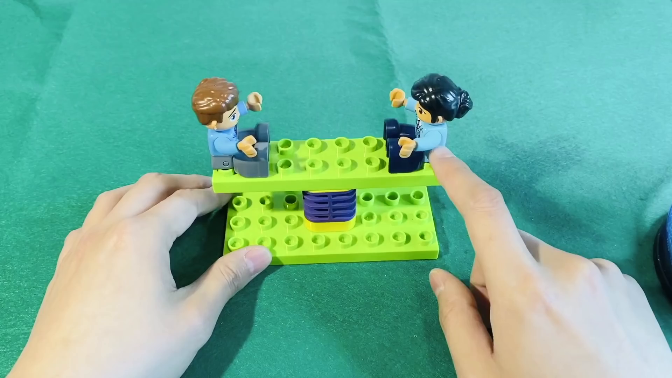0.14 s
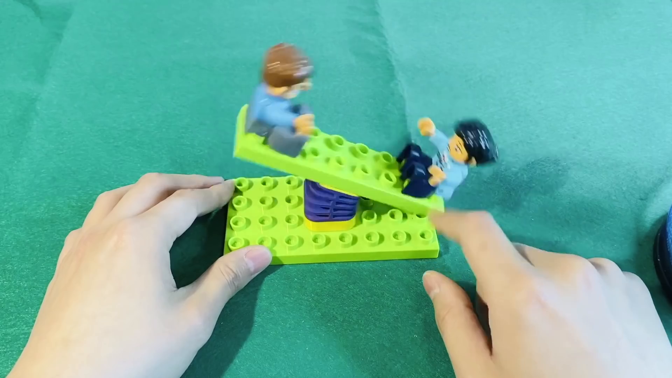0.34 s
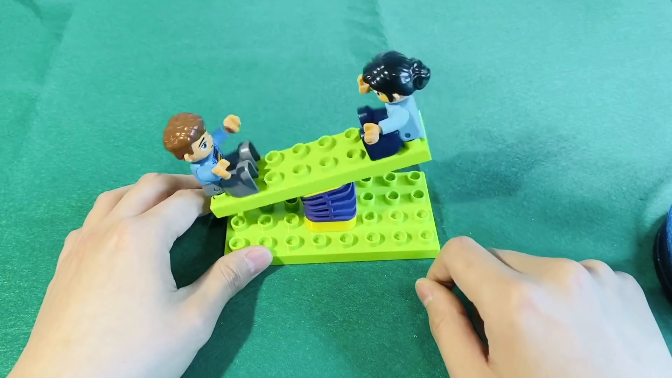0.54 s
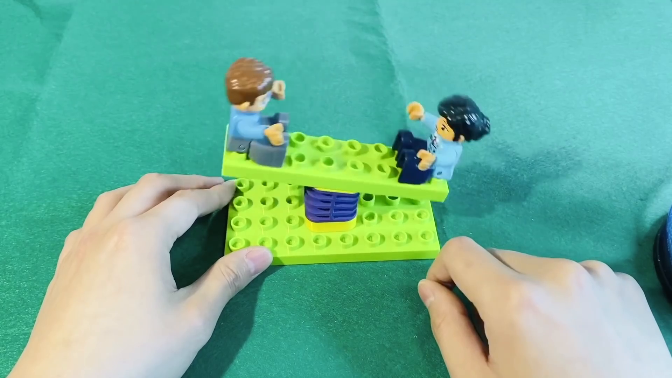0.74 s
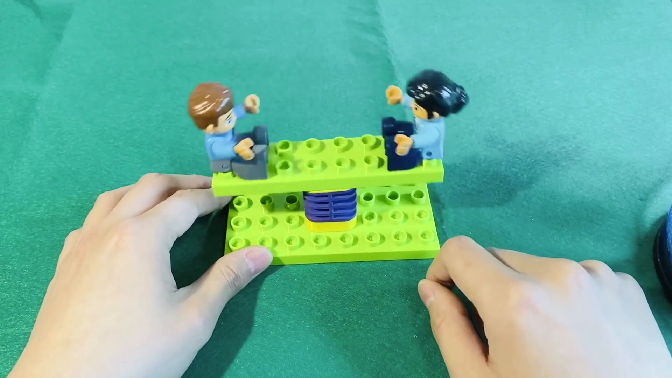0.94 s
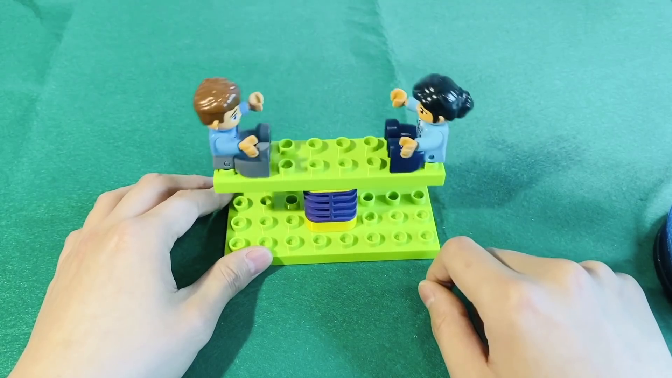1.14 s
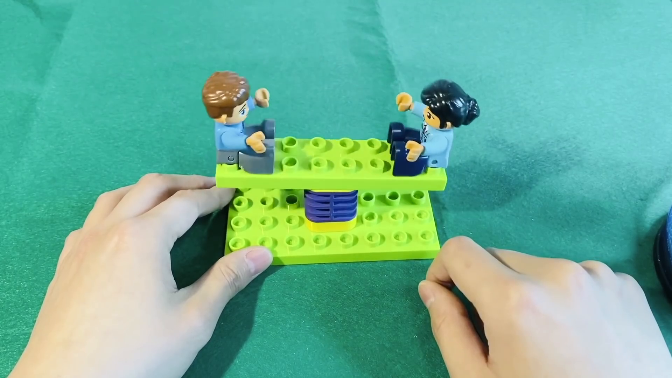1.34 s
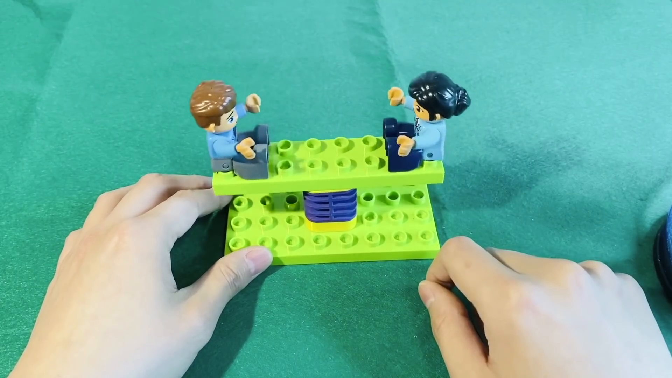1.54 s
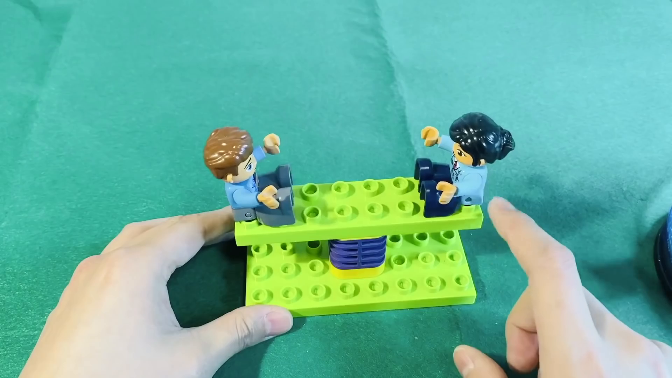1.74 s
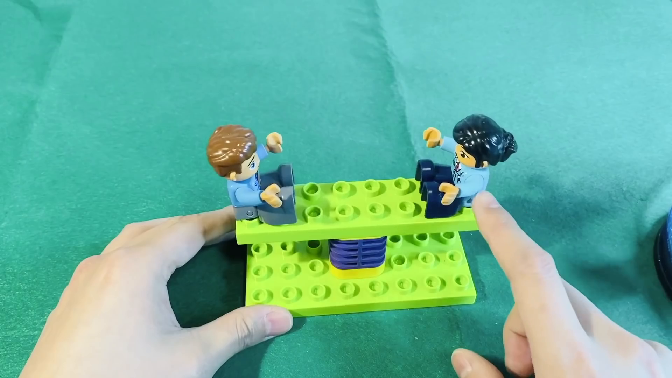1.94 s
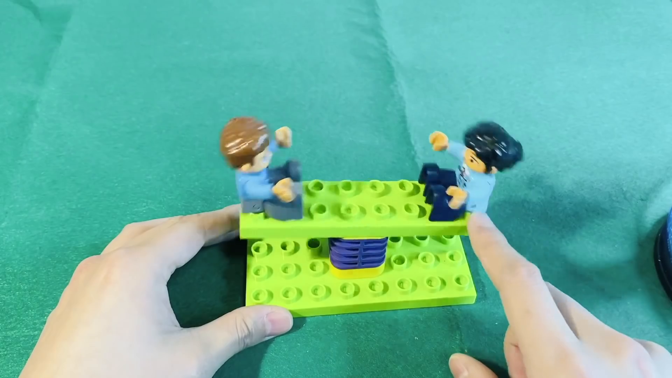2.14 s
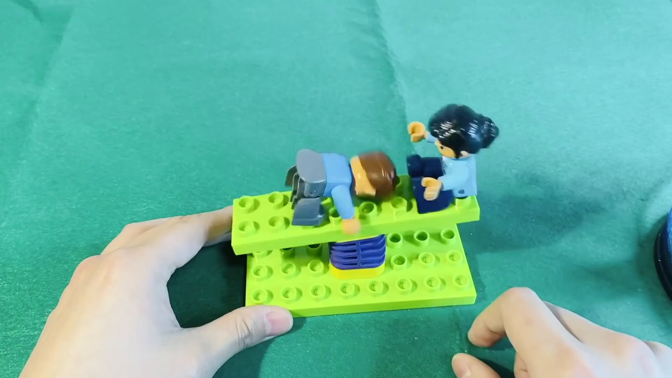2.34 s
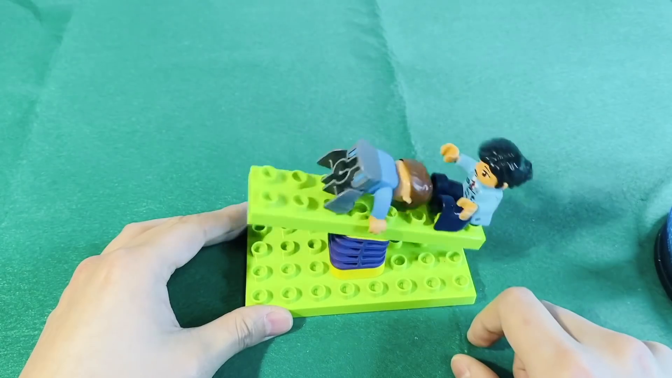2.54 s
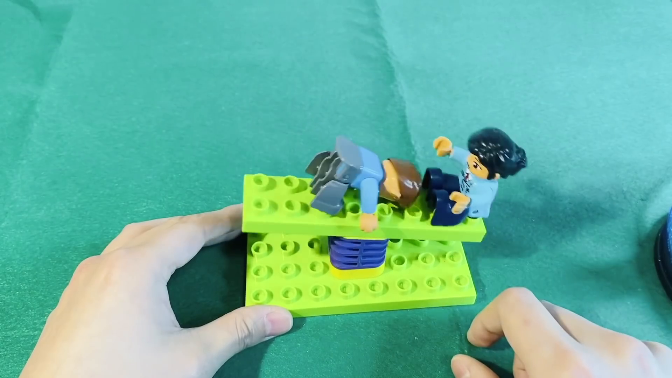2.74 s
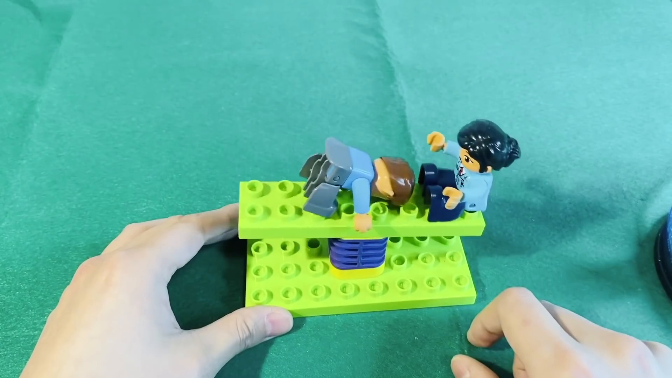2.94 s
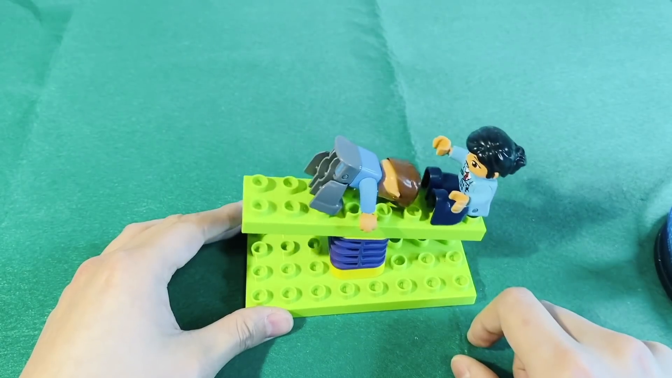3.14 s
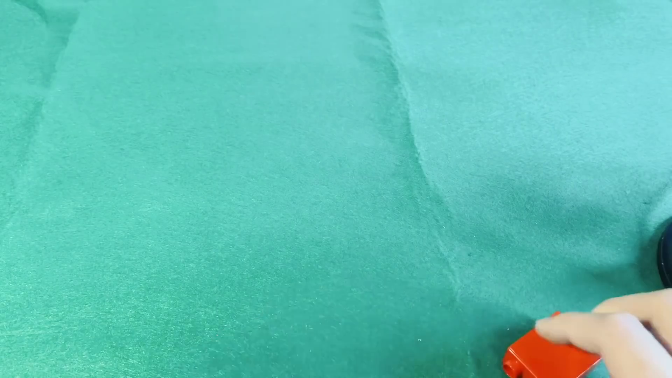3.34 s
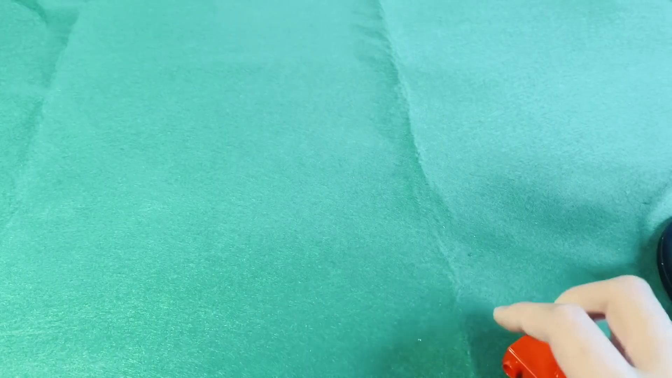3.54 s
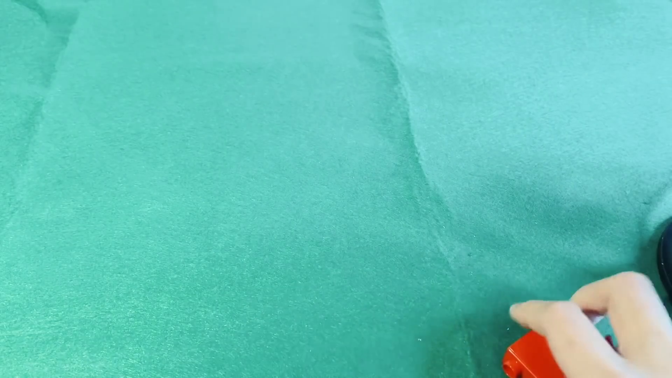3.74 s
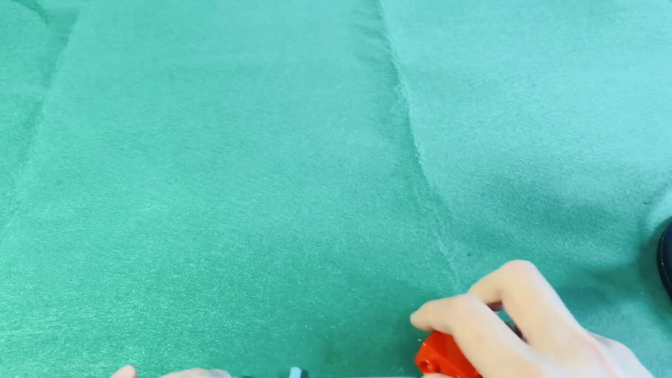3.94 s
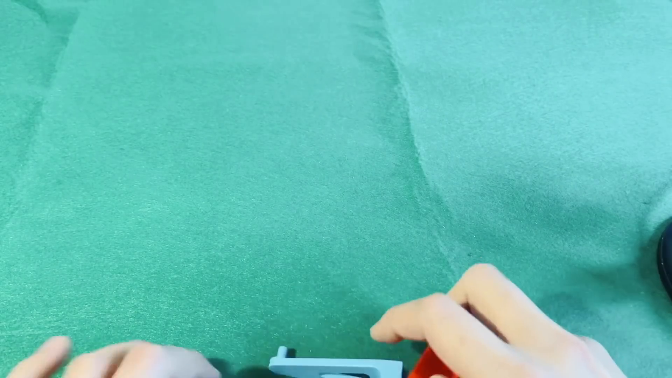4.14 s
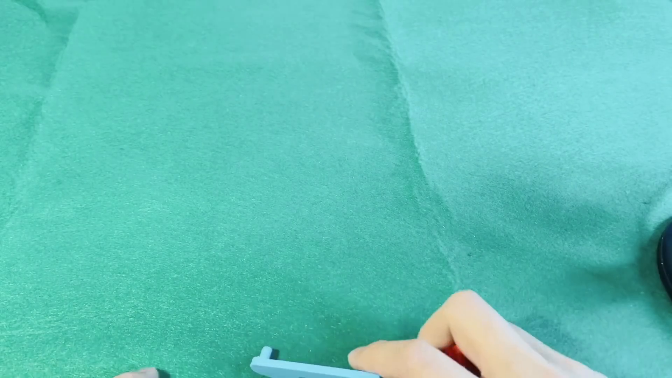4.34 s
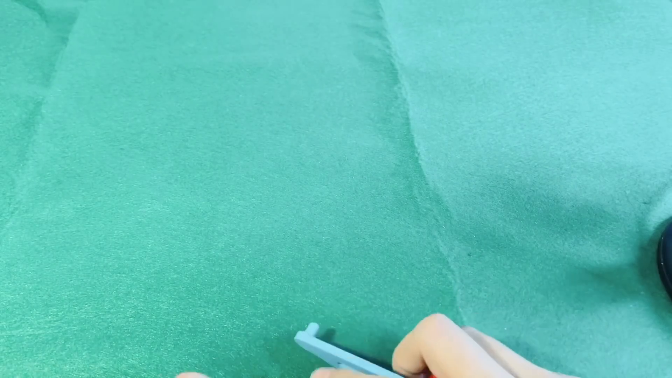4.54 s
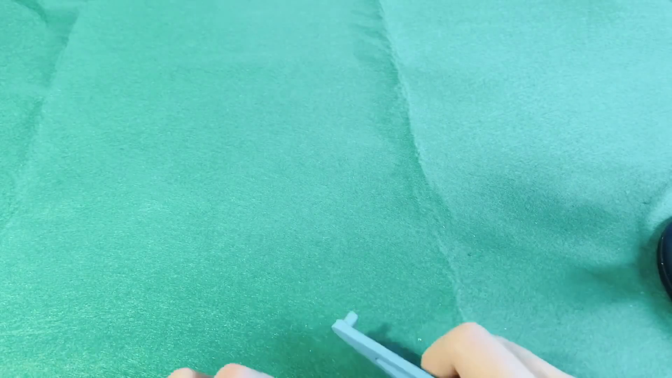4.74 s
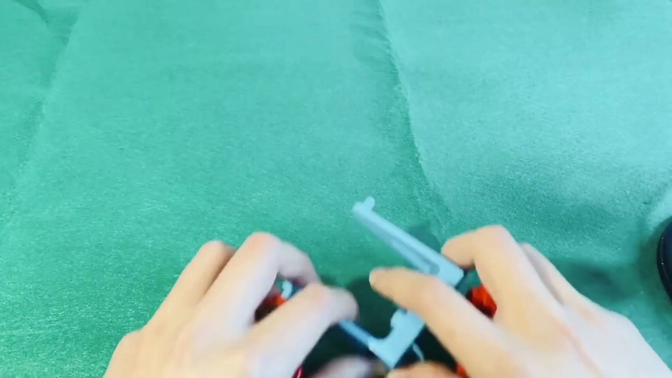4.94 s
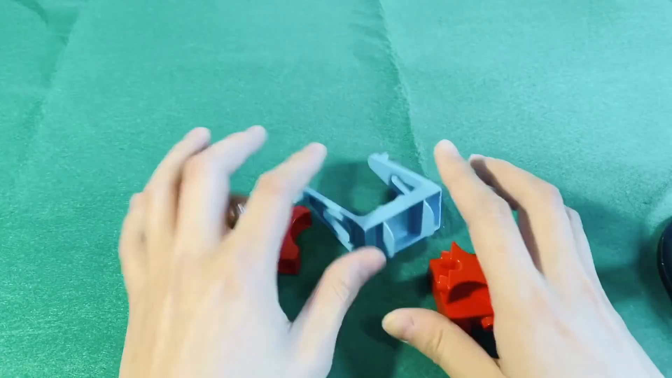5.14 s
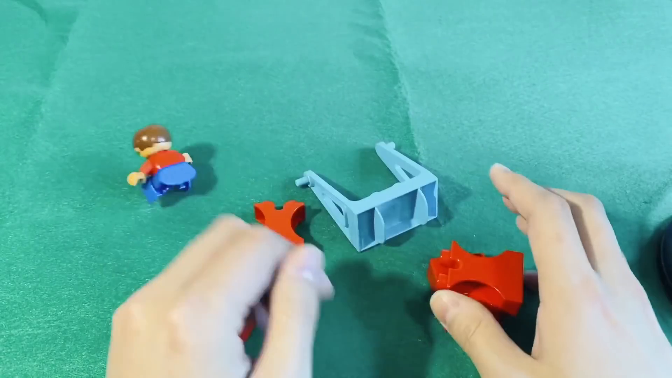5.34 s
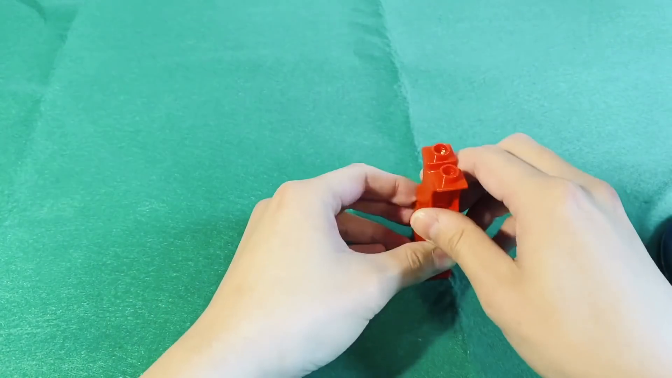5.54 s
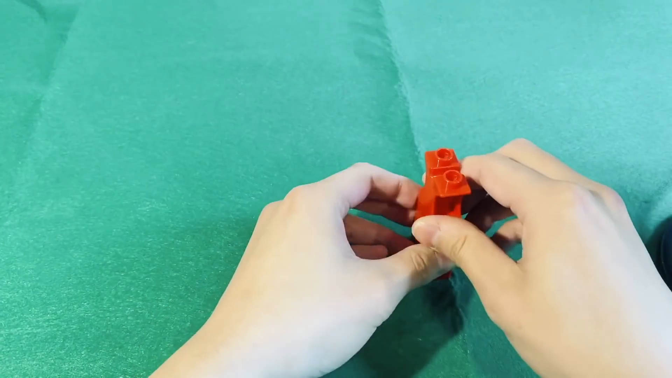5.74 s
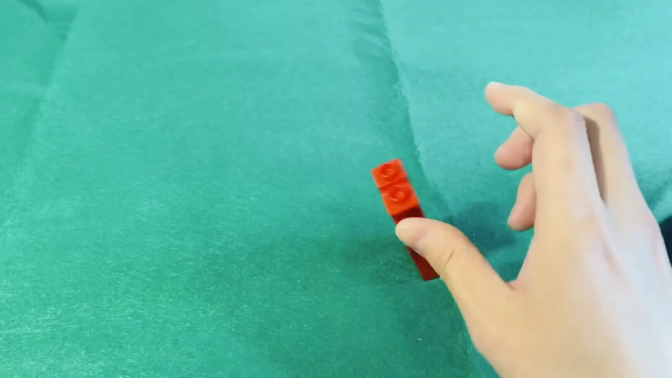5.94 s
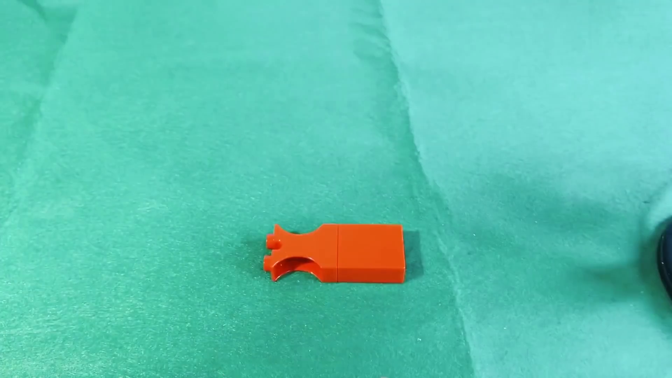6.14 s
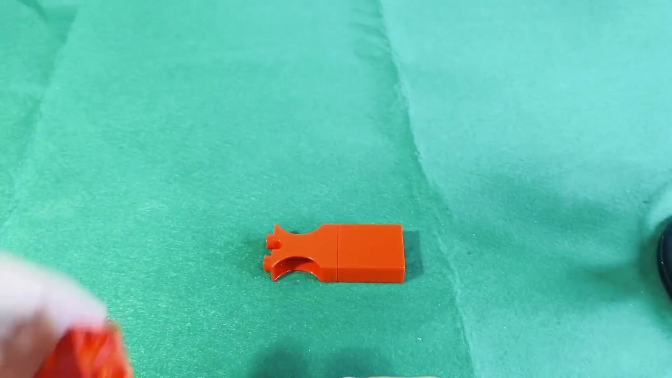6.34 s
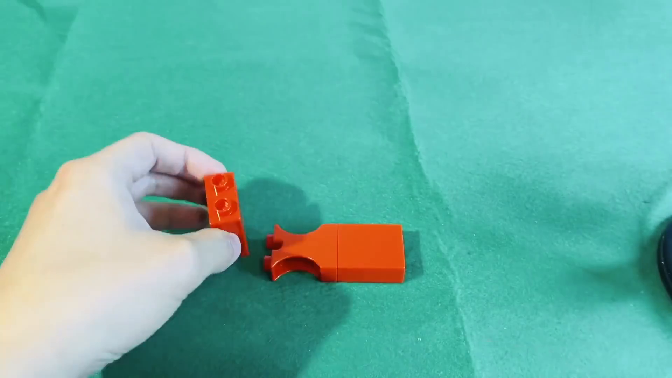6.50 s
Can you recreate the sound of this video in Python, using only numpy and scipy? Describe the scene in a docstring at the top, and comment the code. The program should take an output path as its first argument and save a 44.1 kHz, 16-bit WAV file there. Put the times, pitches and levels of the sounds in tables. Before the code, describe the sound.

Hands handle hollow plastic toy bricks on a soft mat: a knock, a tumbling clack, busy clicking, a bright rattle, dull thumps and quiet.

```python
"""A dry scrape, a tick and a plank knock open the scene: hands play with plastic toy bricks on a clothed desk, close by.
A brick seesaw is tipped, then flipped so that a figure tumbles; loose bricks are picked up, rattled and spilled.
Contacts are blows plus noise chatter ringing plastic modes; landings are dull noise puffs with decaying desk modes.
Shaped noise makes the scrapes, the drags, the hands sliding on cloth, the low rumble and the quiet background."""
import sys
import numpy as np
from scipy import signal
from scipy.fft import rfft, irfft
from scipy.io import wavfile
from scipy.ndimage import uniform_filter1d

SR = 44100
rng = np.random.default_rng(int(sys.argv[2]) if len(sys.argv) > 2 else 0)


def put_to_file(sound):
    """Save the sound as 16-bit audio at rate SR, in the file named by the first command-line argument."""
    columns = np.atleast_2d(sound).T  # one column per channel
    safe = np.clip(columns, -1, 1)
    whole_steps = np.round(safe * 32767)
    wavfile.write(sys.argv[1], SR, whole_steps.astype(np.int16))


N = 289737

# Plastic contacts: t/s, level/dB, struck spot f/Hz, hardness/(dB per octave), chatter t60/s
PLANK_HITS = [(.2646, -13.5, 736, 1.5, 0.02)]
SEESAW_HITS = [(2.0925, -35.5, 2290, -1, 0.034), (2.1498, -21.5, 3830, 3, 0.019),
               (2.1797, -19.5, 2400, 3.5, 0.022), (2.2068, -21.0, 5300, 5, 0.023),
               (2.2155, -14.5, 956, 0, 0.0025), (2.2175, -8.5, 943, 1.1, 0.0037),
               (2.233, -26, 7670, 1, 0.022), (2.243, -23.0, 900, 0.5, 0.017),
               (2.2533, -31, 7500, 3.3, 0.033), (2.2688, -37, 3330, 7, 0.028),
               (2.3005, -24.5, 860, 0.4, 0.07), (2.3436, -23.5, 994, -1.3, 0.022),
               (2.3957, -41, 2520, 1, 0.012), (2.4355, -32.0, 954, -4.5, 0.073),
               (2.4785, -32, 976, -1.5, 0.016), (2.484, -28.5, 2855, -1, 0.033),
               (2.4959, -27.0, 876, 0.5, 0.1), (2.5162, -27, 1063, -7, 0.051),
               (2.5279, -31.5, 940, 1.5, 0.12), (2.5494, -30.0, 987, -5.0, 0.026),
               (2.5646, -36.0, 990, -6, 0.06)]
BRICK_HITS = [(3.5321, -23, 4210, 1.5, 0.025), (3.7534, -37.5, 1770, -4, 0.0065),
              (3.7842, -35, 5300, 1, 0.032), (3.8137, -28, 4650, 0.5, 0.01), (3.8376, -30, 2074, 6.5, .061),
              (3.8508, -20, 1764, -4, 0.022), (3.8743, -24, 1323, -5, 0.0077),
              (3.8871, -19, 1250, -2.5, 0.048), (3.9212, -23.5, 2133, 4, 0.018),
              (3.9448, -17, 2944, -3.5, 0.0037), (3.9597, -26.5, 1602, -1.5, 0.039),
              (3.9823, -30.5, 6360, 9.5, 0.019), (4.0415, -14, 1780, -1.5, 0.066),
              (4.0495, -25.5, 4080, 9.5, 0.018), (4.0568, -20, 1980, -4, 0.029),
              (4.0689, -23, 1993, -1, 0.028), (4.1183, -29, 7900, 7, 0.036),
              (4.1515, -36.5, 1850, 0.5, 0.086), (4.5132, -39, 1265, 1.5, 0.013),
              (4.5756, -34, 1370, -1, 0.028), (4.5832, -19, 2193, -2, 0.005),
              (4.5868, -10.5, 2580, 0, 0.0057), (4.6203, -23, 2560, -0.5, 0.0068),
              (4.7098, -43, 4270, 2, 0.016), (5.269, -41.5, 800, 0, 0.027), (5.6102, -39, 870, -1.5, .008)]
CLINK_HITS = [(4.1978, -33.0, 3000, -7, 0.012), (4.2144, -16.5, 4270, 6, 0.045),
              (4.236, -5.5, 4300, 6.63, 0.015), (4.2524, -12, 4300, 6.5, 0.016),
              (4.2625, -27.5, 4290, -8, 0.01), (4.2712, -21.5, 4230, -9.8, 0.007),
              (4.2748, -13.0, 4340, 8.3, 0.018)]
RATTLE_HITS = [(4.3052, -15.5, 1960, -0.5, 0.024), (4.3086, -17, 2070, 2.5, 0.011),
               (4.3135, -17.5, 3270, 0, 0.027), (4.3272, -15, 5250, -3, 0.012),
               (4.3312, -14, 2060, 1.5, 0.019), (4.3375, -18, 1970, -8.7, 0.011),
               (4.3455, -22.0, 1800, 1.0, 0.018), (4.352, -35, 2050, 5, 0.053),
               (4.3673, -15, 1760, -6.5, 0.011), (4.381, -16.5, 2580, -1, 0.02),
               (4.385, -26, 5500, 2.8, 0.014), (4.4177, -28.5, 2050, -4.3, 0.015)]
SPILL_HITS = [(4.8788, -34, 2890, -2.5, 0.052), (4.8907, -14.5, 6030, 1, 0.016),
              (4.899, -13.5, 5540, 2.0, 0.021), (4.9082, -23.5, 8230, -1.2, 0.066),
              (4.9272, -15, 4970, 6.5, 0.051), (4.9377, -9, 5490, 2, 0.005), (4.947, -20, 6100, 2.6, 0.059),
              (4.9548, -12.0, 2100, 0, 0.13), (4.9678, -19.5, 2080, 5.5, 0.0055),
              (4.9742, -19, 6850, 2, 0.058), (4.986, -31.5, 4100, 4.5, 0.058),
              (5.0005, -25.5, 840, 0.8, 0.049)]
SET_DOWN_HITS = [(6.059, -44, 2030, -16.5, 0.093), (6.1244, -42, 2770, 0, 0.049),
                 (6.153, -36.5, 2030, -1, 0.034), (6.2251, -37, 580, -6.5, 0.048),
                 (6.284, -32, 4950, -1.5, 0.017)]
# Modes of each plastic thing: f/Hz, width/Hz, relative gain/dB
PLANK_MODES = [(486, 94, -12), (704.5, 270, 9), (1250, 130, -12.5), (2470, 300, -2.5), (3334, 16, -1),
               (4120, 490, 2), (5900, 260, -13), (7400, 500, -22)]
SEESAW_MODES = [(532.4, 70, 3), (910, 90, 5.5), (2200, 160, -20.5), (3360, 61, -16.5), (3970, 140, -10.5),
                (5570, 110, -7), (6980, 170, -6.5), (7450, 180, -18.5), (8140, 100, -10.5),
                (13000, 510, -15.5)]
BRICK_MODES = [(1315, 140, 1.5), (1740, 79, 5), (2104, 73, -1), (2930, 180, -9), (4080, 64, -4),
               (3930, 66.8, -6), (5270, 140, -9.5), (5740, 80, -23), (7760, 420, -1.5), (13400, 460, -17)]
SMALL_PART_MODES = [(2191, 27, -10.5), (3660, 200, -11.5), (4281, 56, 2.5), (6160, 98, -17),
                    (8360, 100, -3), (11330, 380, -17), (11800, 870, -12.5)]
FRAME_MODES = [(1320, 81, -0.5), (2110, 150, -8), (3140, 75, -6.5), (3830, 207, -11.5), (4880, 160, -19.5),
               (5440, 50, 7), (7800, 52, 1), (8740, 140, -11.5), (10200, 89, -17), (13500, 51, -22)]
HEAP_MODES = [(1550, 83, -9), (1961, 6.2, -6.5), (2690, 310, -19), (4360, 23.4, 4), (5440, 120, -30),
              (6170, 55, 1), (7600, 21, -10.5), (8180, 130, 2), (8830, 85, -9), (10100, 140, -23.5),
              (11700, 230, -14), (14300, 240, -13)]
HOLLOW_BRICK_MODES = [(575, 64, 11), (810, 510, -3), (1340, 44, -9), (1577, 78, -3), (2094, 69, -4),
                      (3020, 66, -13), (5130, 160, -11.5), (7060, 820, -33)]
# Edges of the four voice bands: f/Hz
BAND_EDGES_HZ = [350, 1500, 3300, 7000, 16000]
# Voice of each thing, relative: hollow knock/dB, clack/dB, click/dB, fine edge/dB
PLANK_VOICE_DB = [-2.5, -3, 0, -13.5]
SEESAW_VOICE_DB = [-1, 1, 1, -6.5]
BRICK_VOICE_DB = [-7.5, -2.5, -1.5, -8]
SMALL_PART_VOICE_DB = [-25, -1, 1.5, -11.5]
FRAME_VOICE_DB = [-12, -3, -2.5, -6]
HEAP_VOICE_DB = [-21, -11, -4, -7]
SET_DOWN_VOICE_DB = [-11, 2.5, 2, -1]
# Plastic scraping on plastic: start/s, end/s, level/dB, centre f/Hz
SCRAPES = [(0.158, 0.204, -54.5, 4370), (0.181, 0.272, -60.5, 2256), (2.046, 2.146, -62.5, 2330),
           (3.604, 3.787, -54, 6800), (3.785, 3.993, -52.5, 2500), (4.239, 4.298, -32.5, 4480),
           (4.377, 4.437, -39.5, 2487)]
# Hollow brick dragged over the mat: start/s, end/s, level/dB
DRAGS = [(6.152, 6.259, -52), (6.275, 6.437, -56.5)]
# Light ticks: t/s, level/dB, reference f/Hz (the passband lies just below)
TICKS = [(.181, -43.5, 3350), (1.973, -59, 1625), (3.081, -58, 1100), (4.487, -44.5, 1955),
         (4.661, -50, 2520), (4.818, -52, 2030), (4.8677, -40.5, 2810), (5.2133, -49, 7170),
         (5.278, -52, 5940), (5.4182, -56, 8570), (5.782, -63.5, 8620)]
# Jostling loose bricks: start/s, end/s, mean level/dB, reference f/Hz as in TICKS
JOSTLES = [(3.659, 3.741, -50.5, 9050), (4.079, 4.14, -59.5, 2375)]
# Soft landings on cloth: t/s, puff level/dB, puff upper f/Hz, desk boom/dB before TOP_LIFT_DB
LANDINGS = [(.266, -31.5, 600, -14.5), (2.168, -47, 500, -25), (2.22, -46, 700, -22.5),
            (2.481, -36.5, 600, -32.5), (3.153, -41.5, 345, -38), (3.244, -45.5, 367, -46.5),
            (4.05, -46, 401, -32.5), (4.184, -28.5, 410, -26.5), (4.389, -28.5, 540, -52),
            (4.586, -31, 400, -34), (4.88, -34, 450, -34.5), (4.966, -24, 1070, -43),
            (4.977, -17.5, 865, -41), (5.007, -16.5, 1120, -20), (5.021, -23, 444, -20),
            (5.089, -30.5, 650, -13.5), (5.27, -22.5, 810, -14.5), (5.283, -21.5, 382, -46),
            (5.611, -41, 1320, -52), (5.704, -49.5, 1079, -46), (5.944, -40, 1430, -28.5),
            (5.951, -23, 1020, -27), (5.971, -32.5, 980, -38), (5.987, -29, 760, -40)]
# Hand moves: start/s, end/s, press/dB before SWAY_LIFT_DB, rumble level/dB, slide/dB before SLIDE_LIFT_DB
HAND_MOVES = [(0.173, 0.357, -43.5, -34, -64.5), (1.95, 2.082, -52.5, -46, -62.5),
              (2.078, 2.504, -33, -32.5, -64.5), (3.147, 3.441, -31, -42, -62),
              (3.547, 3.674, -29, -33, -54), (3.659, 4.165, -38.5, -35, -51),
              (4.17, 4.407, -24, -32.5, -42), (4.426, 4.594, -38.5, -35, -52),
              (4.593, 4.875, -22.5, -37, -55.5), (4.869, 5.268, -30, -30, -56),
              (5.262, 5.402, -19, -37, -55.5), (5.411, 5.929, -46, -45, -74), (5.952, 6.2, -21.5, -42, -74),
              (6.202, 6.421, -59, -47.5, -61)]
# Desk sway modes, nominal: f/Hz, gain/dB, t60/s
SWAY_MODES = [(68.93, -2, 1), (57, -2.5, 0.19), (92.47, -8.5, 0.76)]
# Desk top modes, nominal: f/Hz, gain/dB, t60/s
TOP_MODES = [(126.8, 4, 0.3), (129.6, -4.5, 0.27), (191.4, -20.5, 0.029), (249, -25.5, 0.12),
             (312, -29.5, 0.43)]
# Dry clicks where the boom cuts in and breaks off: t/s, level/dB
SNAPS = [(3.1514, -32), (5.392, -23)]
# Noise spectra, relative: f/Hz, density/(dB per Hz)
CLOTH_SPECTRUM = [(120, -30), (200, 6), (448, -6.5), (569, -8.5), (763, -11.5), (1270, -6), (3020, -8),
                  (7830, -11), (16000, -27)]
RUMBLE_SPECTRUM = [(15, -6.5), (30, -5), (48, 7), (70, 1), (120, -11), (180, -22), (400, -40), (1000, -72)]
QUIET_SPECTRUM = [(59, -48), (100, -18), (143, 6.5), (166, -12), (308, -13.5), (768, -22.5), (1550, -25.5),
                  (4110, -27), (4670, -28), (13500, -30), (16000, -34)]
# Room decay: f/Hz, t60/s
ROOM_T60 = [(150, 0.26), (600, 0.23), (3500, 0.3), (8000, 0.15), (15000, 0.07)]

FOCUS_DB, FOCUS_OCTAVES = 8, 0.7  # voice lift around the struck spot's pitch
MODE_SPREAD_DB = 2.5  # each blow favours different modes
JOSTLE_GAP_S, JOSTLE_SPREAD_DB = 0.017, 6.5
PUFF_T60_CYCLES, PUFF_LOW_HZ = 70, 136  # cycles of the upper frequency: duller is longer
MOVE_RISE_S, SLIDE_FALL_S, SHAKE_T60_S = 0.025, 0.1, 0.99
TOP_LIFT_DB, SWAY_LIFT_DB, SLIDE_LIFT_DB = 5, 2, -2
RESTING_DB, QUIET_DB, ROOM_DB = -56, -62.5, -16.5
BREAK_S, EDGE_HZ = 5.392, 16100


def amp(db):
    """Decibels to gain."""
    return 10 ** (np.asarray(db) / 20)


def evened(x):
    """Scales to rms 1."""
    return x / np.sqrt(np.mean(x ** 2) + 1e-20)


def read(points, hz):
    """Interpolates a table on a log-frequency axis."""
    f, value = np.transpose(points)
    return np.interp(np.log(hz + 1), np.log(f + 1), value)


def add(mix, s, sound):
    """Mixes a sound in at time s."""
    part = mix[max(round(s * SR), 0):][:len(sound)]
    part += sound[:len(part)]


def dying(t, t60):
    """Exponential decay, 60 dB down after t60."""
    return np.exp(-np.log(1000) * t / max(t60, 1e-3))


def burst_power(x):
    """Energy of a short sound as its power over 5 ms."""
    return np.sum(x ** 2) / (0.005 * SR) + 1e-20


def noise(spectrum):
    """Gaussian noise of rms 1 with the given spectrum."""
    gain = amp(read(spectrum, np.fft.rfftfreq(N, 1 / SR)))
    return evened(irfft(rfft(rng.standard_normal(N)) * gain, N))


def causal(gain, size):
    """Minimum-phase response of this magnitude: no ringing before its cause."""
    log_gain = np.log(np.r_[gain, gain[-2:0:-1]] + 1e-5)
    return np.exp(np.conj(signal.hilbert(log_gain)))[:size // 2 + 1]


def resonances(modes, hz):
    """Frequency response of a set of damped modes."""
    return sum(amp(db) / (1 + 2j * (hz - f) / width) for f, width, db in modes)


def unbroken(start, now):
    """False from BREAK_S on for a sound begun by then."""
    return (now < BREAK_S) | (start > BREAK_S)


def hands(grain=0.14):
    """Each move rises, holds and fades; it shakes the desk and brushes the weave of the cloth."""
    t = np.arange(N) / SR
    shake, rub = np.full(N, amp(RESTING_DB)), np.zeros(N)
    for start, end, _, rumble_db, slide_db in HAND_MOVES:
        attack = np.clip((t - start) / MOVE_RISE_S, 0, 1) * unbroken(start, t)
        after = np.maximum(t - end, 0)
        shake = np.maximum(shake, amp(rumble_db) * attack * dying(after, SHAKE_T60_S))
        rub = np.maximum(rub, amp(slide_db) * attack * (1 - after / SLIDE_FALL_S))
    weave = evened(np.exp(grain * evened(uniform_filter1d(rng.standard_normal(N), 60))))
    rumble = shake * noise(RUMBLE_SPECTRUM)
    return rumble + amp(SLIDE_LIFT_DB) * rub * weave * noise(CLOTH_SPECTRUM)


def friction(seconds, grain):
    """A stroke of tiny uneven slips that swells and fades."""
    count = max(round(seconds * SR), 64)
    unevenness = evened(uniform_filter1d(rng.standard_normal(N), size=40))[:count]
    slips = rng.standard_normal(count) * np.exp(grain * unevenness)
    return slips * np.sin(np.pi * np.arange(count) / count)


def scrapes():
    """Dry plastic-on-plastic friction, band-passed about its centre frequency."""
    out = np.zeros(N)
    for start, end, db, hz in SCRAPES:
        edge = signal.butter(2, [hz / 2, min(hz * 2, 16000)], "band", fs=SR, output="sos")
        add(out, start, amp(db) * evened(signal.sosfilt(edge, friction(end - start, grain=0.53))))
    return out


def drags():
    """Friction on the mat rings the modes of a hollow brick."""
    out = np.zeros(N)
    for start, end, db in DRAGS:
        stroke = np.pad(friction(end - start, grain=0.9), (0, 2048))
        response = resonances(HOLLOW_BRICK_MODES, np.fft.rfftfreq(len(stroke), 1 / SR))
        hollow = irfft(rfft(stroke) * response)
        add(out, start, amp(db) * evened(hollow))
    return out


def desk(rise_s=0.037):
    """Landings drum the top, pressing hands sway it; modes swell and die, and at BREAK_S the boom stops dead."""
    t, out = np.arange(SR) / SR, np.zeros(N)
    pushes = [(s, db + TOP_LIFT_DB, TOP_MODES) for s, _, _, db in LANDINGS]
    pushes += [(s, db + SWAY_LIFT_DB, SWAY_MODES) for s, _, db, _, _ in HAND_MOVES]
    for s, push_db, modes in pushes:
        boom = np.zeros(SR)
        for hz, db, t60 in modes:
            detuned_hz = hz * rng.uniform(0.94, 1.02)
            boom += amp(push_db + db) * dying(t, t60) * np.sin(2 * np.pi * detuned_hz * t)
        add(out, s, boom * (1 - np.exp(-t / rise_s)) * unbroken(s, s + t))
    return out


def jostles():
    """Rows for runs of ticks, uneven in spacing and strength."""
    rows = []
    for start, end, db, hz in JOSTLES:
        for s in np.arange(start, end, JOSTLE_GAP_S):
            jitter_s = JOSTLE_GAP_S * (rng.random() - 0.5)
            rows.append((s + jitter_s, db + JOSTLE_SPREAD_DB * rng.standard_normal(), hz))
    return rows


def ticks(t60_s=0.016):
    """Light ticks: decaying noise in a narrow band, with little ring."""
    t, out = np.arange(SR // 20) / SR, np.zeros(N)
    for s, db, hz in TICKS + jostles():
        piece = signal.butter(1, [hz / 1.3, min(hz * 0.88, 16000)], "band", fs=SR, output="sos")
        tick = signal.sosfilt(piece, rng.standard_normal(len(t)) * dying(t, t60_s))
        add(out, s, amp(db) * tick / np.sqrt(burst_power(tick)))
    return out


def contacts(hits, modes, voice_db, crack_db, chatter, bounce, spot_db, spot_width_hz, damped_t60_s,
             bass_hz, soft_hz, size=8192):
    """Blow, rebounds and dying chatter ring the plastic; the spot sets pitch, hardness tilts the voice to treble."""
    t, hz, out = np.arange(size) / SR, np.fft.rfftfreq(size, 1 / SR), np.zeros(N)
    edges = np.array(BAND_EDGES_HZ)
    centres = np.sqrt(edges[:-1] * edges[1:])
    bands = [(hz >= lo) & (hz < hi) for lo, hi in zip(edges, edges[1:])]
    # small parts radiate little bass; finite contact time rounds off the top
    bass_loss, contact_loss = 1 + (bass_hz / (hz + 1)) ** 6, 1 + (hz / soft_hz) ** 6
    radiation = causal(1 / np.sqrt(bass_loss * contact_loss), size)
    gaps_s = np.diff([row[0] for row in hits], append=N / SR)
    for (s, level_db, spot_hz, hardness_db, t60), gap_s in zip(hits, gaps_s):
        focus_db = FOCUS_DB * np.exp(-(np.log2(centres / spot_hz) / FOCUS_OCTAVES) ** 2)
        colour_db = np.array(voice_db) + hardness_db * np.log2(centres) + focus_db
        band_db = level_db + colour_db - 20 * np.log10(np.linalg.norm(amp(colour_db)))
        varied = [(f, width, db + MODE_SPREAD_DB * rng.standard_normal()) for f, width, db in modes]
        body = amp(crack_db) + resonances(varied, hz)
        spot = resonances([(spot_hz, spot_width_hz, spot_db)], hz)
        grains = rng.standard_normal(size) * np.sqrt(rng.exponential(1, size)) * dying(t, t60)
        drive = chatter * grains / np.linalg.norm(grains)
        drive[0] += 1  # the blow
        # random rebounds comb each click differently
        delays_s = np.cumsum(rng.uniform(0.0003, 0.0012, size=3))
        echoes = sum(rng.choice([-1, 1]) * np.exp(-2j * np.pi * hz * d) for d in delays_s)
        ring = rfft(drive) * (1 + bounce * echoes) * radiation * (body + spot)
        for _ in range(3):  # repeated to approach the band levels
            weight_db = [db - 10 * np.log10(burst_power(irfft(ring * band)))
                         for db, band in zip(band_db, bands)]
            ring = ring * causal(amp(read(list(zip(centres, weight_db)), hz)), size)
        held = dying(np.maximum(t - gap_s, 0), damped_t60_s)  # next contact deadens this ring
        fade = np.cos(np.pi / 2 * t / t[-1]) ** 2
        add(out, s, irfft(ring) * held * fade)
    return out


def plank():
    """The plank hits its base: broad low modes with little rebound."""
    return contacts(PLANK_HITS, PLANK_MODES, PLANK_VOICE_DB, crack_db=-16, chatter=1.0, bounce=0.063,
                    spot_db=-4, spot_width_hz=120, damped_t60_s=0.1, bass_hz=152, soft_hz=11500)


def thuds():
    """Cloth cushions a landing into a dull puff of decaying noise."""
    t, out = np.arange(SR // 4) / SR, np.zeros(N)
    for s, db, dull_hz, _ in LANDINGS:
        cushion = signal.butter(3, [PUFF_LOW_HZ, dull_hz], "band", fs=SR, output="sos")
        burst = rng.standard_normal(len(t)) * dying(t, PUFF_T60_CYCLES / dull_hz)
        puff = signal.sosfilt(cushion, burst)
        add(out, s, amp(db) * puff / np.sqrt(burst_power(puff)))
    return out


def seesaw():
    """The tumbling seesaw: hollow low modes under a clattering top."""
    return contacts(SEESAW_HITS, SEESAW_MODES, SEESAW_VOICE_DB, crack_db=-16, chatter=0.56, bounce=0.33,
                    spot_db=5, spot_width_hz=85, damped_t60_s=0.12, bass_hz=218.5, soft_hz=10100)


def snaps(t60_s=0.012):
    """Decaying steps: the dry clicks with which the boom cuts in and breaks off."""
    out = np.zeros(N)
    for s, db in SNAPS:
        add(out, s, amp(db) * dying(np.arange(2048) / SR, t60_s))
    return out


def bricks():
    """Single bricks: strong chatter and rebounds, little bass radiation."""
    return contacts(BRICK_HITS, BRICK_MODES, BRICK_VOICE_DB, crack_db=-4, chatter=1.8, bounce=0.47,
                    spot_db=6, spot_width_hz=280, damped_t60_s=0.097, bass_hz=920, soft_hz=12300)


def clinks():
    """A small ringing part, quickly deadened by the next contact."""
    return contacts(CLINK_HITS, SMALL_PART_MODES, SMALL_PART_VOICE_DB, crack_db=-33.5, chatter=0.35, bounce=0.14,
                    spot_db=-26.5, spot_width_hz=85, damped_t60_s=0.02, bass_hz=397, soft_hz=13000)


def rattle():
    """A thin frame rattles, its chatter stronger than the blow."""
    return contacts(RATTLE_HITS, FRAME_MODES, FRAME_VOICE_DB, crack_db=-15, chatter=3.7, bounce=0.4,
                    spot_db=-0.5, spot_width_hz=85, damped_t60_s=0.08, bass_hz=705, soft_hz=12900)


def spill():
    """The spilled heap rings in many high modes that overlap from hit to hit."""
    return contacts(SPILL_HITS, HEAP_MODES, HEAP_VOICE_DB, crack_db=-11.5, chatter=1.4, bounce=0.41,
                    spot_db=6.5, spot_width_hz=85, damped_t60_s=0.18, bass_hz=398, soft_hz=13930)


def set_down():
    """The hollow brick set down last, ringing its own modes."""
    return contacts(SET_DOWN_HITS, HOLLOW_BRICK_MODES, SET_DOWN_VOICE_DB, crack_db=-28, chatter=1.6, bounce=0.37,
                    spot_db=-21, spot_width_hz=180, damped_t60_s=0.072, bass_hz=597, soft_hz=9850)


def room(x, onset_s=0.005):
    """A small furnished room: a diffuse noise tail whose high treble dies first."""
    hz, t, z = signal.stft(rng.standard_normal(SR // 2), SR, nperseg=256)
    decay_db = -60 * t / read(ROOM_T60, hz)[:, None]
    colour_db = read([(300, 8), (4000, -3.5), (14000, 3.5)], hz)[:, None]
    tail = signal.istft(z * amp(decay_db + colour_db), SR, nperseg=256)[1]
    tail = tail * (1 - np.exp(-(np.arange(len(tail)) / SR / onset_s) ** 2))
    return signal.fftconvolve(x, tail / np.linalg.norm(tail))[:N]


def scene():
    """Everything on the desk, its room and the quiet background."""
    plastic = plank() + seesaw() + bricks() + clinks() + rattle() + spill() + set_down()
    near = plastic + ticks() + thuds() + scrapes() + drags()
    low = desk() + snaps() + hands()
    background = amp(QUIET_DB) * noise(QUIET_SPECTRUM)
    return (near + amp(ROOM_DB) * room(near) + low + background)[None]


def record(dry):
    """Clips peaks at full scale, then limits the band."""
    lowpass = signal.firwin(511, EDGE_HZ, window=("kaiser", 9), fs=SR)
    return signal.oaconvolve(np.clip(dry, -1, 1), lowpass[None], "same")


dry = scene()
out = record(dry)
put_to_file(out)
```